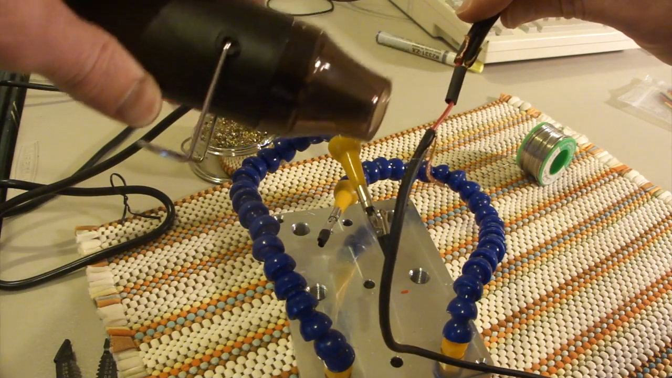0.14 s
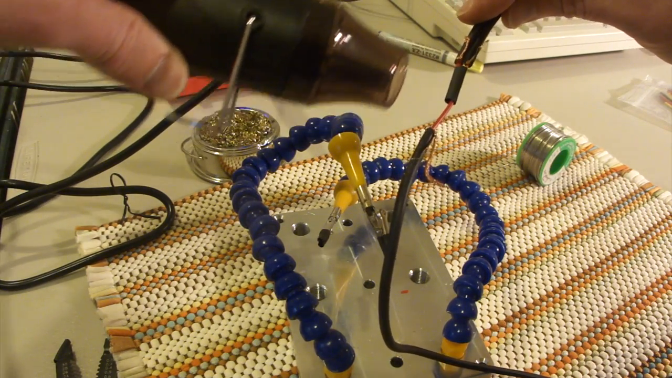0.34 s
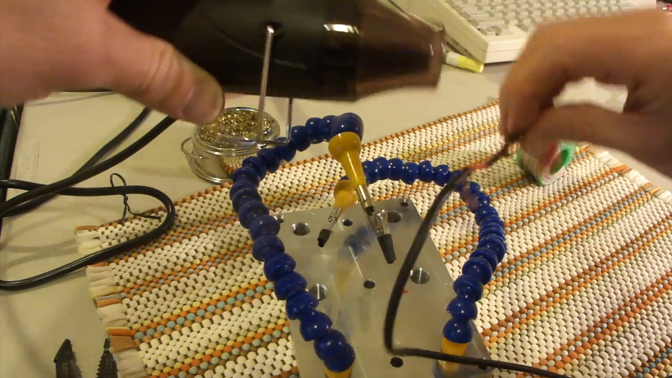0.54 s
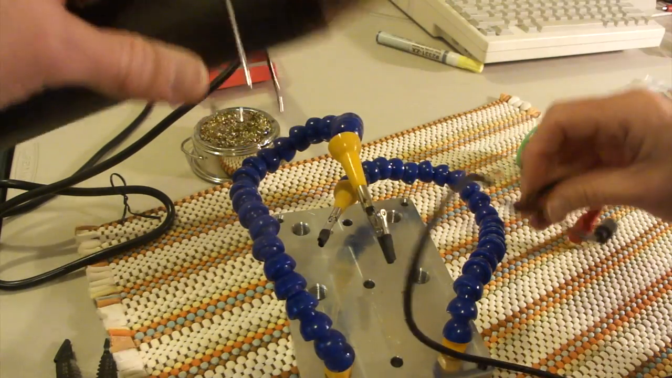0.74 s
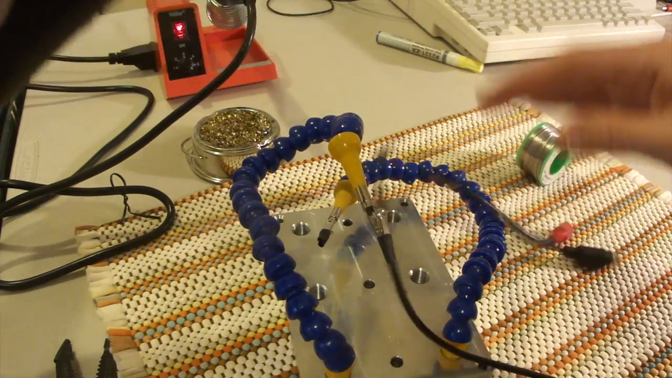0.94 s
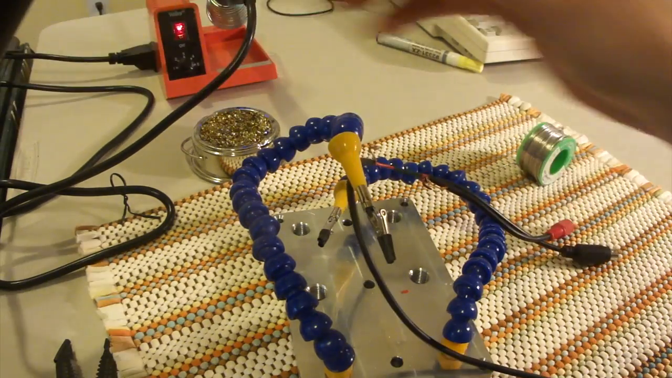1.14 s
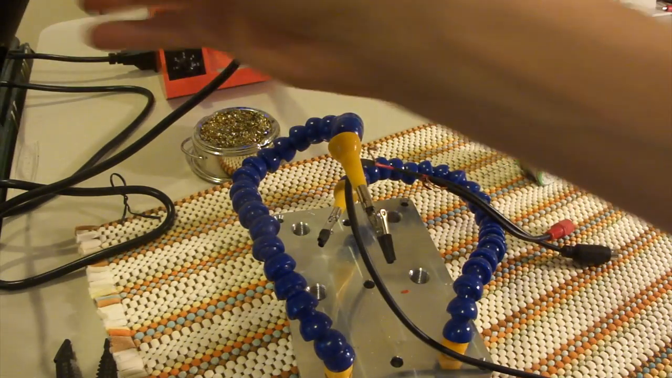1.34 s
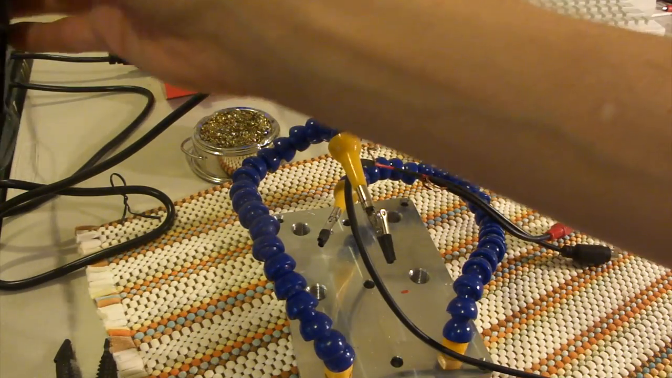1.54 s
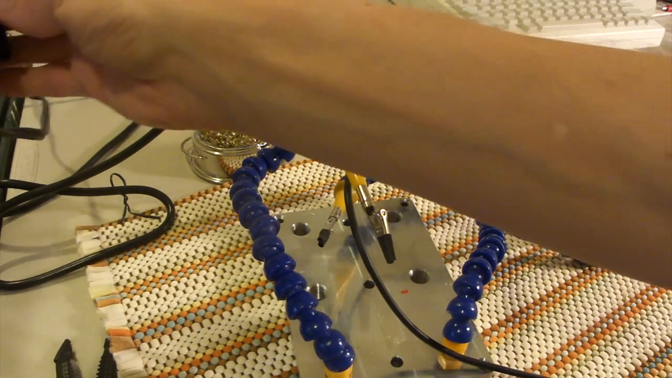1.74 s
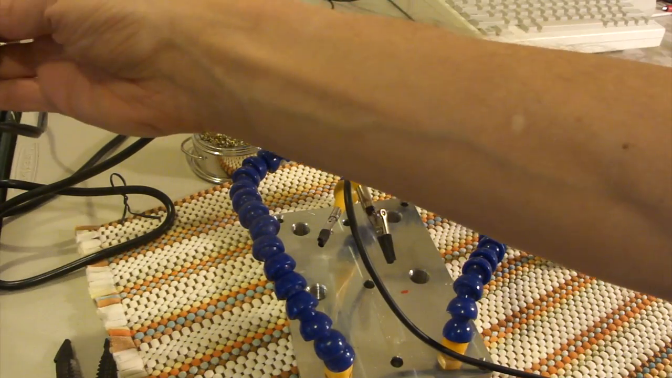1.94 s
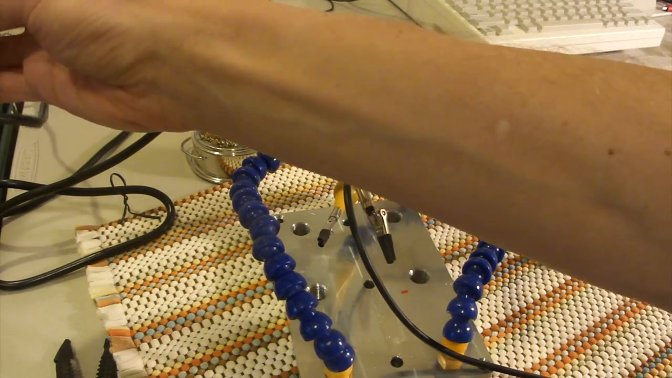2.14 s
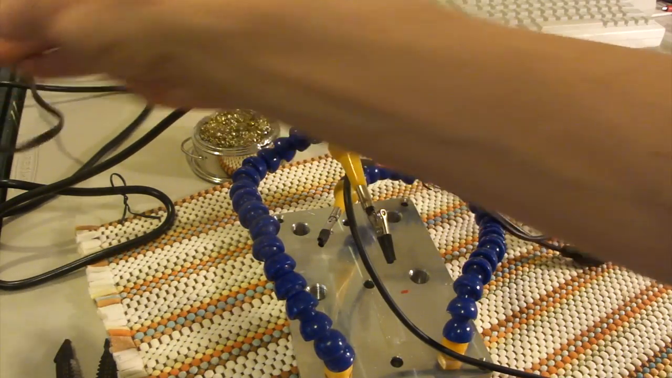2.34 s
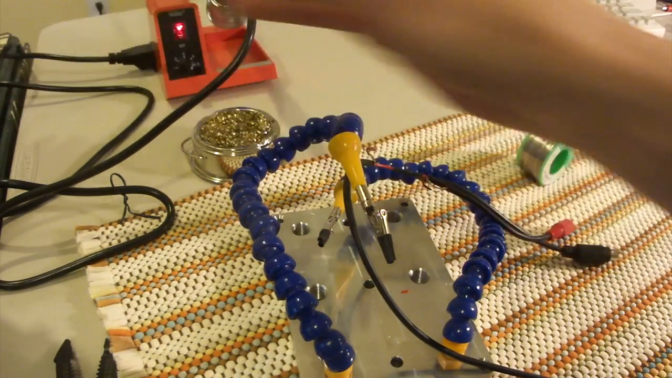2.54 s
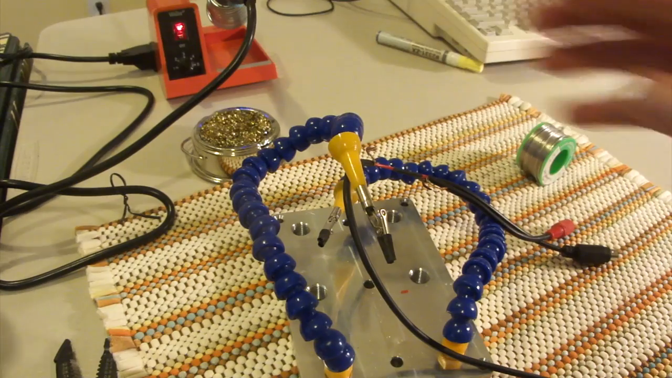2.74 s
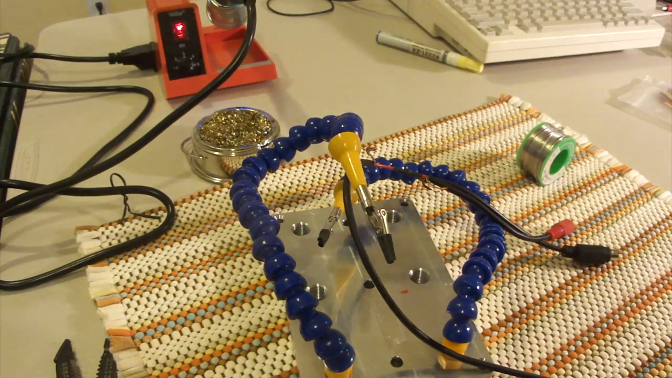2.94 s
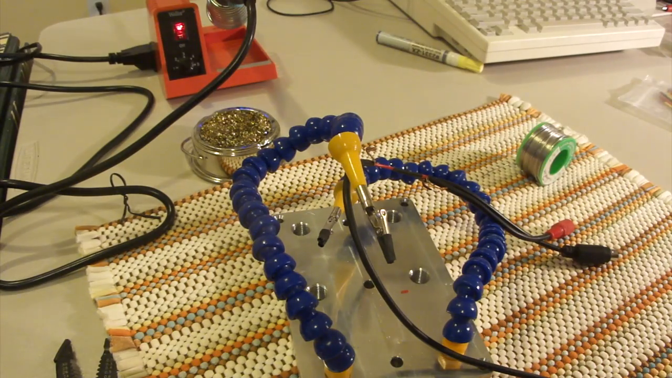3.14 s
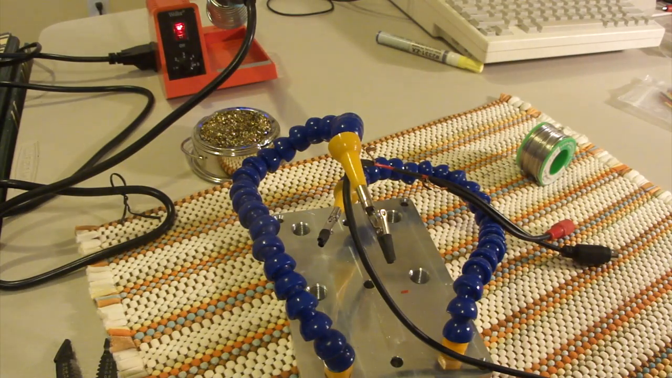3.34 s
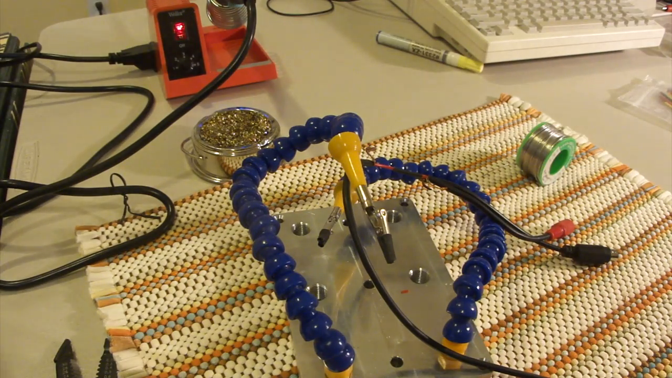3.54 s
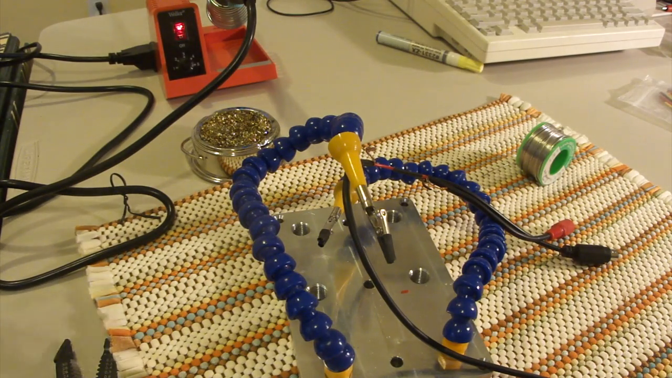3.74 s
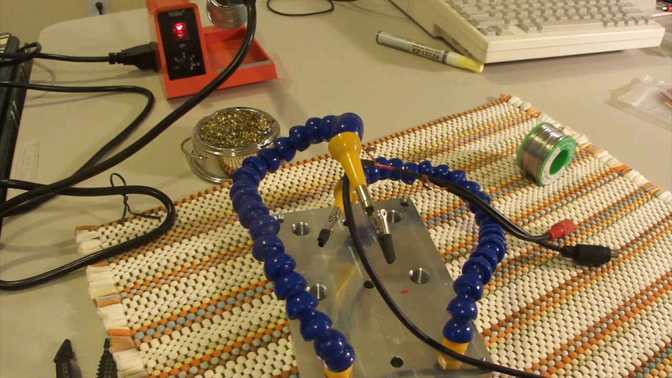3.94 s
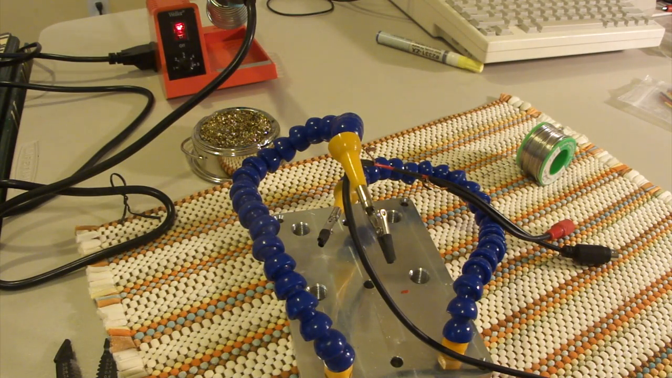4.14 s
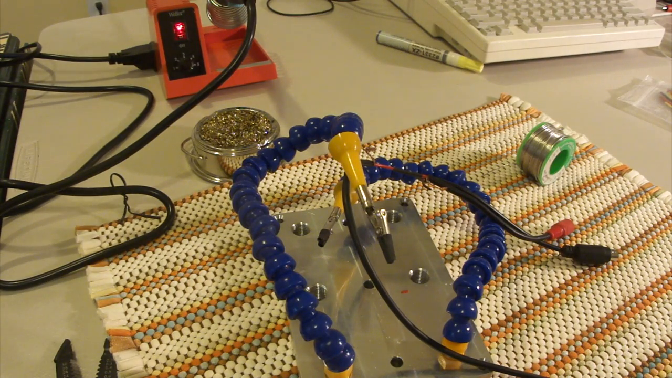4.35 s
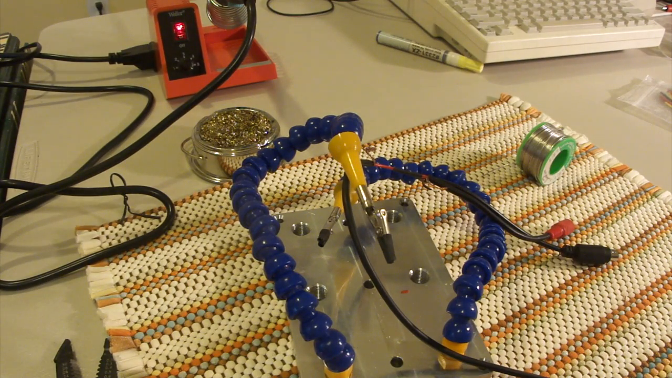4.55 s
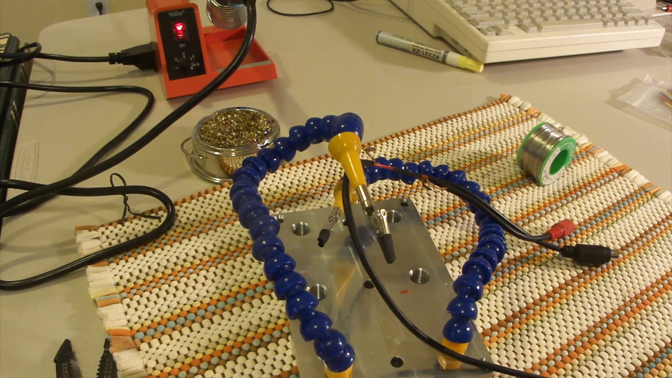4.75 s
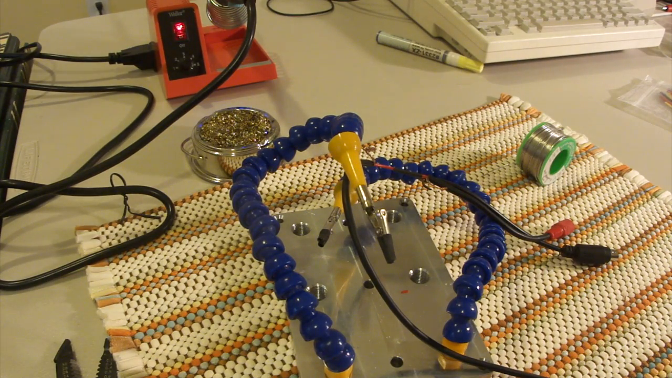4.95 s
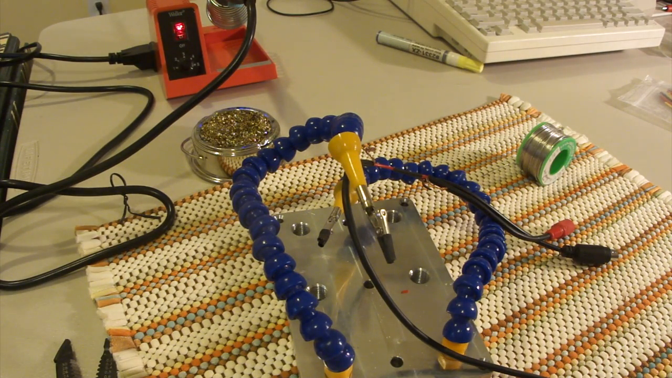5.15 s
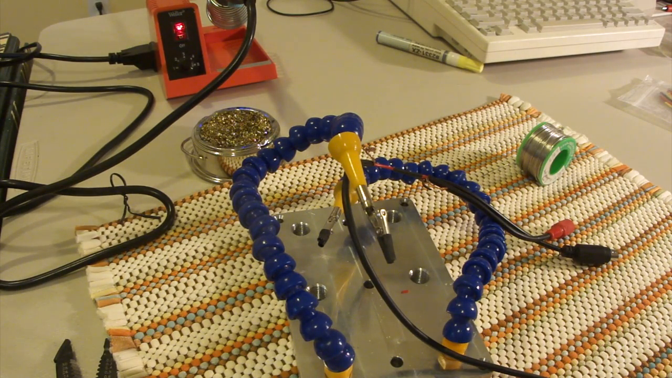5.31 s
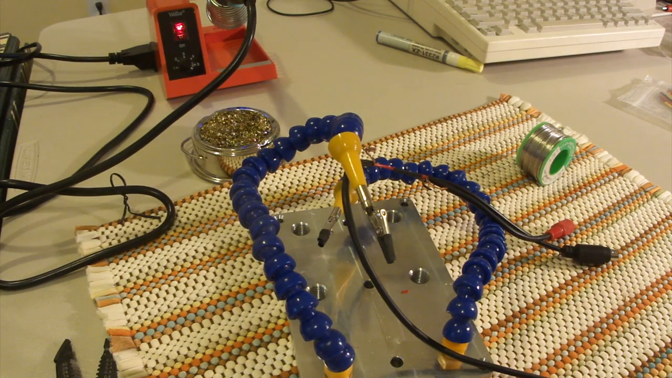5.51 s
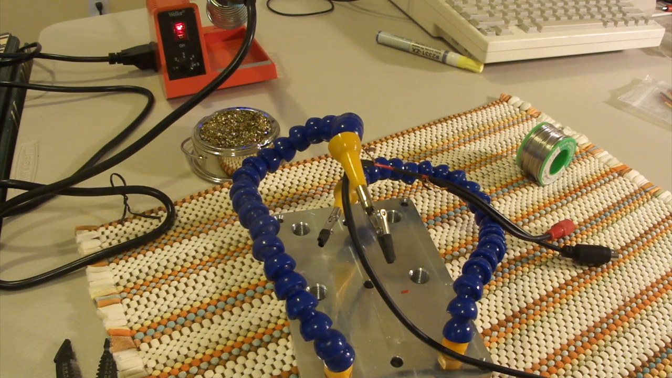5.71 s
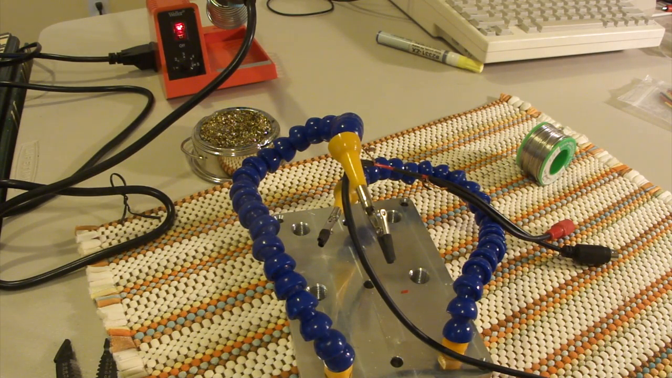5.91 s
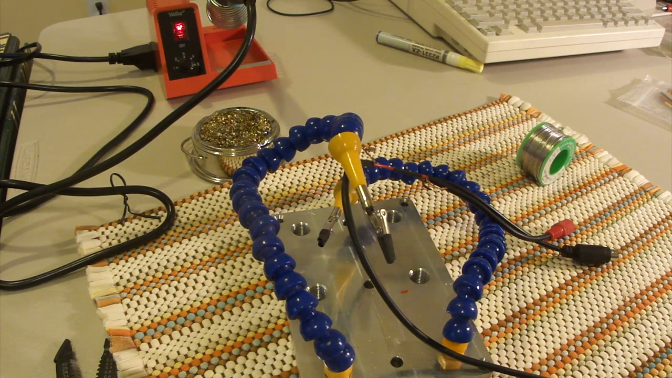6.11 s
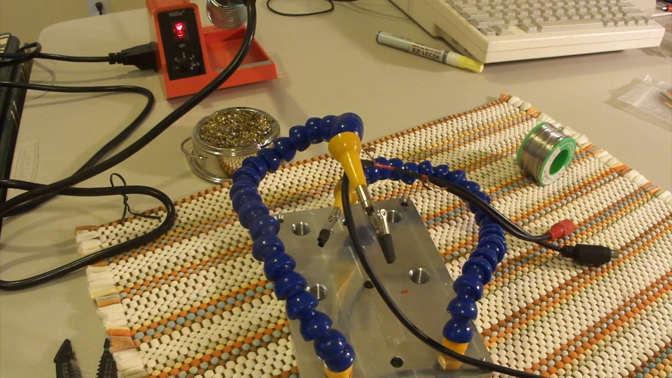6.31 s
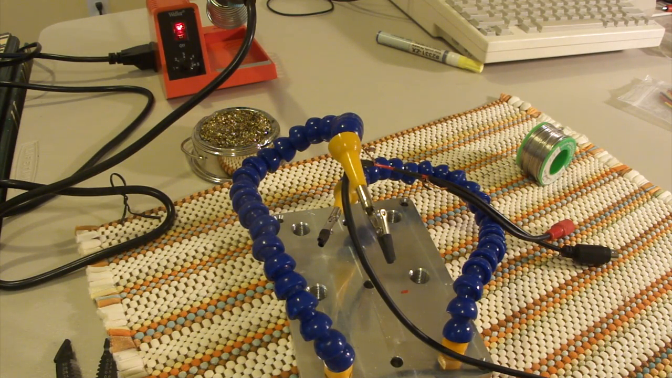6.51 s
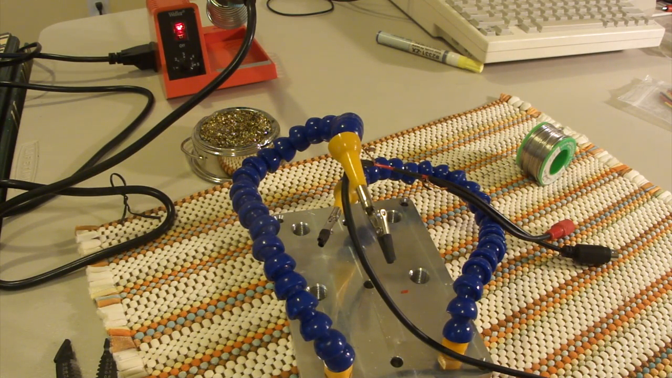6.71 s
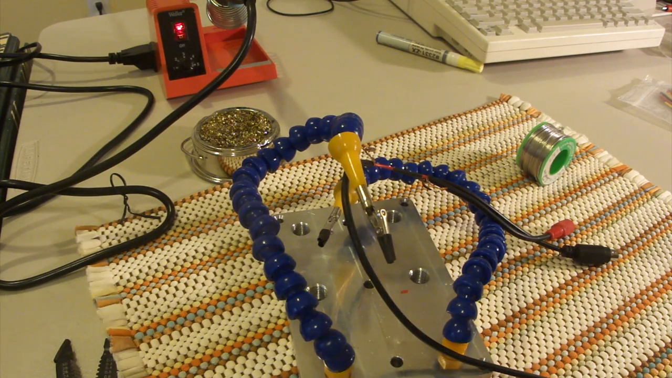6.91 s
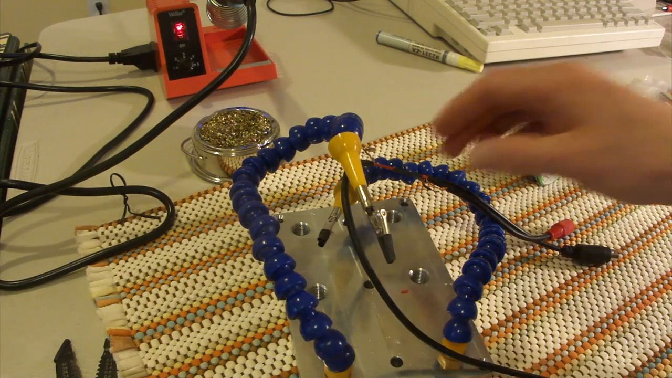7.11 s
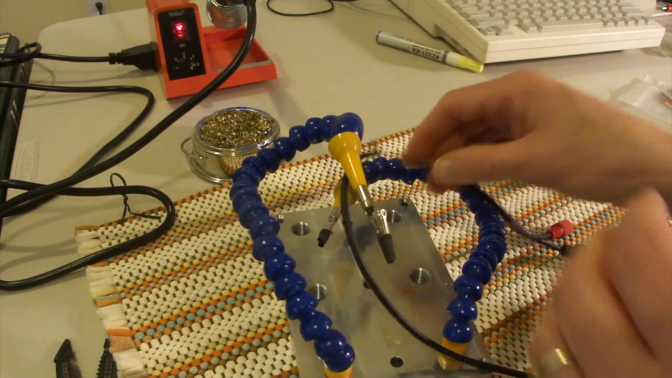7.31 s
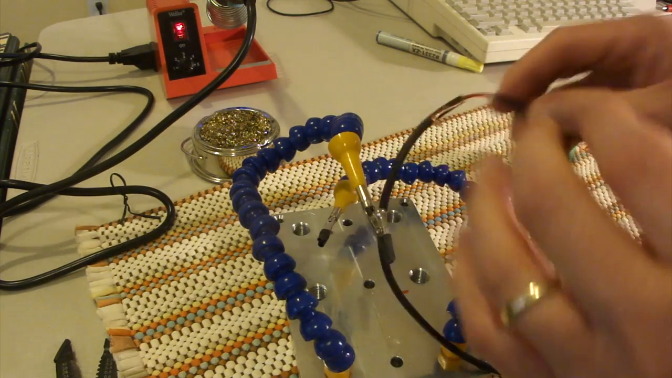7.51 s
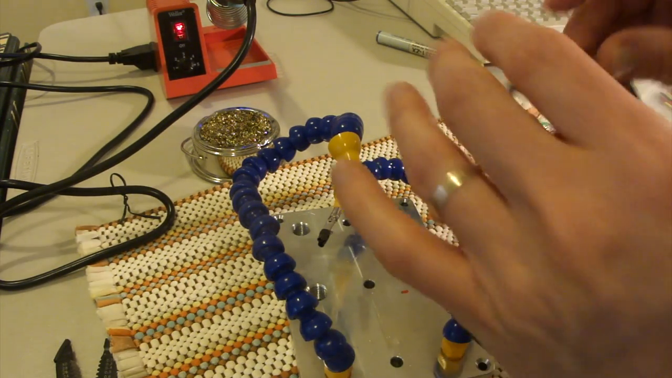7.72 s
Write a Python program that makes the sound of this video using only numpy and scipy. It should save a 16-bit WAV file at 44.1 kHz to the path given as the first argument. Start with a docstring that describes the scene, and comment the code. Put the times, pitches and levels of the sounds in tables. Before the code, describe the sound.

A rushing hot air blower and its high, steady fan whistle fill the opening, brightening slightly as the nozzle turns away. A switch click cuts power and the fan coasts down within about a second. The gun clunks down and rattles on the bench. Small hard objects click nearby and further off, with soft shuffles and close wire ticks. Close stereo microphones, small dry room, steady low noise.

```python
"""Hot air gun on a workbench

The gun blows over a soldered joint, swings aside and is switched off; it clicks as its fan coasts down.
Shaped noise makes the air; sines locked to the shaft make the whistle and the other fan tones.
The gun is put down with two knocks (damped modes and filtered impulses); small hard things are handled
nearby and further off, and a wire ticks close by. Small dry room with steady noise and mains hum;
two close microphones."""
import sys
import numpy as np
from scipy import signal
from scipy.fft import rfft, irfft, next_fast_len
from scipy.io import wavfile
from scipy.ndimage import uniform_filter1d

SR = 44100
rng = np.random.default_rng(int(sys.argv[2]) if len(sys.argv) > 2 else 0)


def store_wav(level_fs):
    """Save 16-bit WAV to argv[1]."""
    pcm = np.round(np.clip(np.atleast_2d(level_fs), -1, 1) * 32767)
    wavfile.write(sys.argv[1], SR, pcm.T.astype(np.int16))


N = 346999
TIME = np.arange(N) / SR

# Fan shaft rate; it speeds up as the nozzle leaves the joint. Each row: time in seconds, rate in Hz.
SHAFT_HZ = [(.48, 298.3), (.54, 308.8)]
# After switch-off: drag time constant, and bearing friction.
OFF_S, COAST_S, FRICTION_HZ_PER_S = 2.169, .46, 148
BLADES = 5

# Nozzle hiss as the gun turns. Each row: time in seconds, level in dB before hiss_db and fan speed.
HISS_AIM_DB = [(0.0, -40.5), (0.08, -40), (0.85, -40), (1.17, -36), (1.41, -39), (2.05, -34.5),
               (2.15, -34.5)]
# Share of the air's colour. Each row: time in seconds, share (0 = nozzle on the joint, 1 = swung aside).
ASIDE_SHARE = [(.42, 0.17), (.65, 1)]
# Air through housing and nozzle, on the joint. Each row: frequency in Hz, relative density in dB per Hz.
AIR_ON_JOINT = [(35, -80), (60, -48), (265, -26.5), (296, -10.5), (338, -24), (482, -11.5), (602, -2),
                (715, 0.5), (1090, -10), (1460, -3), (1710, -17), (1900, -4), (2080, -2.5), (2200, -12.5),
                (2550, -17.5), (2970, -46.5), (9200, -30.5), (10700, -45.5), (12000, -109.5), (15600, -125),
                (22000, -120)]
# The same, swung aside. Each row: frequency in Hz, relative density in dB per Hz.
AIR_ASIDE = [(60, -49), (120, -28), (260, -25), (430, -15.5), (560, -9.5), (620, 3), (730, 1.5),
             (1000, -6.5), (1290, -4.5), (1425, 5), (1470, 1.5), (1600, 2), (1950, -3.5), (2350, -13),
             (2700, -16), (3150, -30), (4900, -35.5), (5500, -21.5), (6200, -20), (8300, -22.5),
             (11000, -34.5), (12000, -91.5)]
RUSH_DB = -22  # at full fan speed

# Blade whistle, beamed past the microphones. Each row: time in seconds, level in dB before fan speed.
WHISTLE_DB = [(0.0, -39), (0.5, -29), (0.53, -26), (0.58, -20.5), (0.72, -21.5), (0.776, -19),
              (0.876, -16.5), (1.1, -28.5), (1.16, -23.5), (1.25, -35), (1.29, -24.5), (1.44, -25),
              (1.48, -36.5), (2.13, -39), (2.15, -29.5)]
# Other fan tones before the housing. Each row: multiple of the shaft rate, level in dB.
SHAFT_ORDERS = [(2, -43), (3, -40.5), (4, -38), (6, -39), (7, -43), (8, -36.5), (26, -50), (33, -30.5)]
# Whistle overtones before the housing. Each row: multiple of the blade rate, dB on the joint, dB aside.
BLADE_OVERTONES = [(2, -44, -38), (3, -47, -41.5), (4, -52, -41), (5, -54, -47), (6, -42, -58),
                   (7, -51, -56)]
# What the housing lets out of the overtones. Each row: frequency in Hz, gain in dB.
HOUSING_GAIN = [(500, -22), (800, -15), (1070, 3), (1300, -1), (1580, 0), (1900, -8), (2350, -7.5),
                (2700, -23), (3100, -30), (4600, -28), (6200, -15), (7700, -19), (11000, -7)]
MOTOR_DB = -49.5  # hum at the shaft rate, at full fan speed
SHRILL_HZ = 2800  # overtones above this die quickly once the fan slows

# Gun first touches the bench and chatters. Each row: start in seconds, level in dB, snap in dB re ring.
TOUCHES = [(3.072, -9, -7), (3.0812, -20, -6), (3.1034, -19.5, -37), (3.1323, -28, -30)]
# Ringing of the gun's body. Each row: frequency in Hz, level in dB, t60 in seconds.
GUN_MODES = [(203, -17.5, 0.16), (357, -17, 0.17), (464, -9, 0.047), (624, -19, 0.076), (690, -11.5, .04),
             (870, -16.5, .06), (1250, -1, 0.013), (1270, -16, 0.073), (1780, -25, 0.045)]
# Gun lands and rocks. Each row: start in seconds, level in dB before offsets, brightest contact Hz.
LANDING = [(3.2271, -19, 2200), (3.2418, 3, 9000), (3.2535, -1.5, 3000), (3.2622, -1.5, 7000),
           (3.2712, -1, 900), (3.2848, -12, 1500), (3.3058, -10, 2000), (3.335, -17, 700)]
# Ringing of the bench. Each row: frequency in Hz, relative level in dB, t60 in seconds.
BENCH_MODES = [(456, -22, .25), (502, -28, .22), (568, -27, .22), (619, -19, .2), (670, -22, .24),
               (768, -27, .16), (920, -27, .15), (1008, -22, .15), (1067, -20, .15), (1158, -18, .15),
               (1364, -27, .18), (1927, -25, .19)]
# A click of the gun as the fan coasts down, then small hard things handled nearby and further off.
# Each row: start in seconds, level in dB before lift_db, ring in Hz,
# cycles until the ring is 60 dB down, thud and snap in dB re ring, room in dB re direct.
KNOCKS = [(2.5314, -17.5, 1170, 7.2, -6, -12.5, -2.5), (2.5343, -15.5, 1700, 11, -14, -29, -7.5),
          (2.549, -31, 1250, 5.8, -3, -17, -12), (2.684, -37.5, 1100, 6.1, 10.5, -10, -1),
          (4.291, -42.5, 1180, 6.4, 11, -12, 5.5), (4.323, -26.5, 523, 15, -19, -30, -5),
          (4.409, -40.5, 1150, 32, 10, -5, 3), (4.415, -30, 530, 18, -3, -20, -10),
          (4.504, -35.5, 537, 17, 1, -24, -11), (4.564, -29.5, 1880, 9.5, -1.5, -9.5, 5),
          (5.025, -20.5, 1900, 8.5, -6, -11, -5.5), (5.034, -31, 1910, 10, -7, -9, -8),
          (5.3407, -29.5, 1510, 33, -5, -15, 0.5), (5.351, -32, 1580, 15, 2, -8.5, 0.5),
          (5.605, -34.5, 1230, 7, 1, -12, 4), (5.617, -33.5, 1960, 7.6, -4, -5.5, -3),
          (5.976, -36, 1200, 17, 4.5, -11, 2.5), (6.06, -43, 1160, 15, 3.5, -20, 4.5),
          (7.711, -34, 1720, 11, -10, -8, -10), (7.72, -34.5, 1810, 7.1, -1, -16, -5)]
# Dull part of a blow. Each row: frequency in Hz, relative density in dB per Hz.
THUD_COLOUR = [(50, -82), (130, -5), (250, -12), (500, 7.5), (900, 5), (1900, 4.5), (2500, -7.5),
               (3200, -40), (9000, -56), (13000, -74)]
# Sharp part of a blow. Each row: frequency in Hz, relative density in dB per Hz.
SNAP_COLOUR = [(100, -49), (1500, -48), (3200, -21.5), (4800, -23), (5700, -8.5), (7800, -9.5),
               (10000, -12.5), (12000, -36.5), (15000, -48)]
# Broad thump of the landing gun. Each row: frequency in Hz, relative density in dB per Hz.
BLOW_COLOUR = [(40, -105), (130, -15.5), (280, -7), (400, -2.5), (520, 4), (700, 10), (860, 2), (1200, 6),
               (1600, -6.5), (2150, -9.5), (3000, -27.5), (5000, -33), (6000, -27), (10000, -31),
               (14000, -50)]

# Wire and clamp close by. Each row: start in seconds, level in dB, ring in Hz, snap in dB re ring.
TICKS = [(6.884, -30, 1440, -3.5), (6.948, -54, 3800, 17), (6.971, -37, 1540, -5), (7.238, -45, 2000, 0),
         (7.2974, -22, 2065, -7), (7.444, -48.5, 2600, 4), (7.468, -37, 2200, -22),
         (7.5405, -34, 2110, -28), (7.694, -34.5, 1070, -26)]
# What they ring with. Each row: share of the ring pitch, level in dB, t60 in seconds.
TICK_MODES = [(0.928, 0.5, 0.015), (0.677, -7, 0.042), (1.17, -15.5, 0.025)]
# Crackle of the wire. One row: start in seconds, length in seconds, loudest dB, spread in dB.
CRACKLE = (6.885, .055, -38.5, 9)
# Faint thin ticks, probably a small focus motor. Each row: start in seconds, level in dB before step_db.
STEPS = [(3.5911, -54), (3.7248, -58), (3.7572, -54), (3.8241, -55), (3.8914, -58), (3.9578, -56.5),
         (4.0241, -54), (4.091, -53), (4.175, -51.5)]
# Soft shuffles. Each row: middle in seconds, length in seconds, level in dB before rub_db.
SHUFFLES = [(4.473, 0.24, -43.5), (4.877, 0.28, -38.5), (5.043, 0.13, -39), (5.63, 0.094, -37),
            (6.389, 0.16, -45), (7.143, 0.32, -44)]
# Colour of the rubbing. Each row: frequency in Hz, relative density in dB per Hz.
SHUFFLE_COLOUR = [(30, -50), (100, -20), (300, 9.5), (550, 10.5), (1200, 4), (2100, -1.5), (3100, -31),
                  (7000, -21.5), (11000, -30), (13000, -73.5)]

# Steady workshop noise. Each row: frequency in Hz, relative density in dB per Hz.
FLOOR_COLOUR = [(18, -49), (30, -65), (86, -21.5), (108, -21), (173, -4.5), (253, -4.5), (564, -7.5),
                (608, -7), (885, -7.5), (1140, -8.5), (2020, -12.5), (2950, -35), (4700, -42), (5600, -33),
                (9110, -30.5), (10500, -46), (12000, -75), (15600, -68.5), (22000, -120)]
FLOOR_DB = -46
# Steady workshop tones. Each row: frequency in Hz, mean rms level in dB.
HUM = [(120, -63), (240, -59.5), (720, -60), (1152, -61.5)]
# Decay of the diffuse echo. Each row: band centre in Hz, t60 in seconds.
ROOM_T60 = [(200, 0.46), (700, 0.29), (2000, 0.24), (8500, 0.24), (13000, 0.01)]
# Narrow notches of the camera. Each entry: centre in Hz.
NOTCHES_HZ = (3010, 4010, 5020)
TOP_HZ = 14700  # edge of the camera's low-pass


def coast():
    """Shaft rate in Hz: under power until OFF_S, then run down by drag and constant friction."""
    drag = np.exp(-np.maximum(TIME - OFF_S, 0) / COAST_S)
    friction_loss_hz = FRICTION_HZ_PER_S * COAST_S * (1 - drag)
    return np.maximum(curve(SHAFT_HZ) * drag - friction_loss_hz, 0)


def air(speed, hiss_db=-1.0, rush_power=2.43, hiss_power=2.53, flutter_db=1.34):
    """Turbulence rings the housing and hisses at the nozzle; both die with the fan's speed."""
    aside = curve(ASIDE_SHARE)
    on_joint_air = np.sqrt(1 - aside) * noise(AIR_ON_JOINT, wide_hz=13200, lag_us=23.6)
    aside_air = np.sqrt(aside) * noise(AIR_ASIDE, wide_hz=13200, lag_us=23.6)
    flow = on_joint_air + aside_air
    rush = signal.sosfiltfilt(signal.butter(4, 4000, fs=SR, output="sos"), flow)
    hiss = flow - rush
    # Level the hiss over 0.1 s so that HISS_AIM_DB sets it.
    hiss = hiss / np.sqrt(uniform_filter1d(np.mean(hiss ** 2, axis=0), SR // 10))
    rush = unit(rush) * undb(RUSH_DB + flutter_db * walk(24.73)) * speed ** rush_power
    hiss = hiss * undb(curve(HISS_AIM_DB) + hiss_db + 1.35 * walk(16)) * speed ** hiss_power
    return rush + hiss


def fan(shaft_hz, speed, whistle_power=0.6, tone_power=0.72, power_per_order=0.23, waver_db=3):
    """Blade whistle, motor hum, shaft tones, and overtones gliding down through the housing's resonance."""
    phase = 2 * np.pi * np.cumsum(shaft_hz * (1 + .0006 * walk(30))) / SR
    whistle = undb(curve(WHISTLE_DB) + walk(37.1)) * speed ** whistle_power * np.sin(BLADES * phase)
    whistle = whistle * np.clip(speed / 0.5, 0, 1) ** 6  # a slow rotor soon stops whistling
    motor = undb(MOTOR_DB + walk(15)) * speed ** 6 * np.sin(phase)
    tones = whistle + motor
    turning = np.clip(speed / .28, 0, 1) ** 4
    aside = curve(ASIDE_SHARE)
    for order, db in SHAFT_ORDERS:
        power = tone_power + power_per_order * order  # the highest tones fade first
        gain = undb(db + response(AIR_ASIDE, order * shaft_hz) + waver_db * walk(29.23))
        tone = np.sin(order * phase + rng.uniform(0, 2 * np.pi))
        tones = tones + turning * speed ** power * gain * tone
    for multiple, joint_db, aside_db in BLADE_OVERTONES:
        order = BLADES * multiple
        hz = order * shaft_hz
        source_db = joint_db + (aside_db - joint_db) * aside
        gain = undb(source_db + response(HOUSING_GAIN, hz) + 2 * walk(30.56))
        gain = gain * speed ** ((hz / SHRILL_HZ) ** 2)
        tones = tones + turning * gain * np.sin(order * phase + rng.uniform(0, 2 * np.pi))
    return in_room(np.sqrt(2) * tones, wet_db=-18)[:, :N]


def switch(click_db=-4, ring_hz=2020, edge_db=-4):
    """The gun's switch snaps off: a short damped ring plus a bright edge of high-passed grit."""
    out = np.zeros((2, N))
    click = knock(ring(ring_hz, .009), thud_db=-18, snap_db=9.5, room_db=-8, contact_s=.0005)
    add(out, OFF_S, undb(click_db) * click)
    bright = signal.butter(4, 7000, "highpass", fs=SR, output="sos")
    edge = signal.sosfilt(bright, grit(contact_s=.0008))
    add(out, OFF_S, undb(edge_db) * edge)
    return out


def touch(thud_db=-8):
    """The gun first touches the bench with a dry, hollow clunk of its body modes."""
    out = np.zeros((2, N))
    body = sum(undb(db) * ring(hz, t60, size=8192) for hz, db, t60 in GUN_MODES)
    for s, db, snap_db in TOUCHES:
        clunk = knock(body, thud_db, snap_db, room_db=-8, contact_s=0.0011, scrape=.2)
        add(out, s, undb(db) * clunk)
    return out


def landing(blow_db=-4, contact_s=0.0022, scrape=1.0, swell_s=0.0011):
    """Each contact gives a broad thump, duller when soft, and sets the bench top ringing."""
    out, t, blow = np.zeros((2, N)), TIME[:SR // 2], impulse(BLOW_COLOUR)
    modes = sum(undb(db) * fade(t, t60) * np.sin(2 * np.pi * hz * t) for hz, db, t60 in BENCH_MODES)
    modes = modes * (1 - np.exp(-t / swell_s))
    for s, db, top_hz in LANDING:
        soften = signal.butter(2, [150, top_hz], "bandpass", fs=SR, output="sos")
        thump = signal.sosfilt(soften, strike(blow, contact_s, scrape))
        add(out, s, in_room(thump * undb(db + blow_db), wet_db=-8))
        add(out, s, undb(db) * signal.sosfilt(soften, modes))
    return out


def ticks(pan_db=-6, wet_db=-20, step_hz=4900, step_t60=.003, step_db=5.5):
    """Light, nearly dry clicks just right of the microphones: faint steps, a brief crackle, wire and clamp."""
    snap = strike(impulse(SNAP_COLOUR), contact_s=0.0028, scrape=0.84)
    out = patter(snap + undb(-2) * ring(1860, .004), *CRACKLE, count=14)
    for s, db in STEPS:
        add(out, s, undb(db + step_db) * ring(step_hz, step_t60))
    for s, db, hz, snap_db in TICKS:
        rings = sum(undb(mode_db) * ring(share * hz, t60) for share, mode_db, t60 in TICK_MODES)
        add(out, s, undb(db) * (rings + undb(snap_db) * snap))
    pan = undb(np.array([[pan_db], [-pan_db]]) / 2)
    return in_room(out, wet_db)[:, :N] * pan


def patter(click, start_s, length_s, level_db, spread_db, count):
    """A run of tiny clicks at uneven intervals and strengths."""
    out = np.zeros(N)
    for late, strength in rng.uniform(0, 1, (count, 2)):
        add(out, start_s + length_s * late, undb(level_db - spread_db * strength) * click)
    return out


def knocks(contact_s=0.0036, lift_db=3, top_hz=9500):
    """A click of the gun, then small hard things nearby and further off: rings, thuds, snaps, low-passed."""
    out = np.zeros((2, N))
    for s, db, hz, cycles, thud_db, snap_db, room_db in KNOCKS:
        sound = knock(ring(hz, cycles / hz), thud_db, snap_db, room_db, contact_s)
        add(out, s, undb(db + lift_db) * sound)
    return signal.sosfilt(signal.butter(4, top_hz, fs=SR, output="sos"), out)


def shuffling(rub_db=-3, grain_db=1.0):
    """Uneven soft rubbing some way off: coloured noise; each move swells and fades."""
    swells = sum(undb(db) * np.exp(-(2 * (TIME - s) / length) ** 2) for s, length, db in SHUFFLES)
    return noise(SHUFFLE_COLOUR, wide_hz=8000) * swells * undb(rub_db + grain_db * walk(110))


def workshop():
    """Steady ventilation noise with mains hum that wavers slightly in level and phase."""
    hum = sum(undb(db + 1.74 * walk(5.5)) * np.sin(2 * np.pi * hz * TIME + .5 * walk(7.8)) for hz, db in HUM)
    floor = noise(FLOOR_COLOUR, wide_hz=8110, apart=0.44) * undb(FLOOR_DB + 0.13 * walk(5.3))
    return floor + np.sqrt(2) * hum


def knock(rings, thud_db, snap_db, room_db, contact_s, scrape=0.55):
    """One hard contact: the object's ring, a thud and a snap, heard in the room."""
    thud = undb(thud_db) * impulse(THUD_COLOUR, size=len(rings))
    body = strike(rings + thud, contact_s, scrape)
    snap = impulse(SNAP_COLOUR, size=len(rings))
    crack = signal.fftconvolve(snap, grit(contact_s))[:len(rings)]
    return in_room(body + undb(snap_db) * crack, room_db)


def strike(body, contact_s, scrape):
    """A body's answer to a blow followed by a brief scrape."""
    return body + scrape * signal.fftconvolve(body, grit(contact_s))[:len(body)]


def grit(contact_s, size=2048):
    """Brief roughness of two surfaces that meet: decaying noise of unit energy."""
    force = rng.standard_normal(size) * np.exp(-TIME[:size] / contact_s)
    return force / np.linalg.norm(force)


def ring(hz, t60, size=4096):
    """One damped mode of a small object, which radiates little far below or above its pitch."""
    t = TIME[:size]
    band = signal.butter(2, [hz / 2, hz * 1.5], "bandpass", fs=SR)
    return signal.lfilter(*band, np.sin(2 * np.pi * hz * t) * fade(t, t60))


def room(size=SR // 2):
    """Diffuse echo of the workshop with unit energy; each band decays at its own t60."""
    t, hz = TIME[:size], bins(size)
    spectrum = rfft(noise([(20, 0.0013), (20000, 0.0086)], wide_hz=8750, size=size))  # near white
    centres = [f for f, _ in ROOM_T60]
    shares = [response(list(zip(centres, pick)), hz) for pick in np.eye(len(centres))]
    tail = sum(irfft(spectrum * share, size) * fade(t, t60) for share, (_, t60) in zip(shares, ROOM_T60))
    tail = tail * np.clip(t / 0.003 - .4, 0, 1)  # the nearest walls answer after a few ms
    return tail / np.sqrt(np.sum(tail ** 2) / 2)


def in_room(x, wet_db):
    """Direct sound plus its echo, in stereo."""
    echo = room() * undb(wet_db)
    echo[:, 0] += 1
    return signal.fftconvolve(x[None], echo, axes=1)


def noise(points, wide_hz, lag_us=0, apart=0.031, size=N):
    """Coloured noise at two close microphones: nearly alike in the bass, unrelated towards wide_hz."""
    padded = next_fast_len(size, True)
    hz = bins(padded)
    mid, side = rfft(rng.standard_normal((2, padded)))
    side = side * np.minimum(np.hypot(apart, hz / wide_hz), 1)
    late = np.exp(-2j * np.pi * hz * lag_us / 10 ** 6)  # delays the left
    stereo = np.array([(mid + side) * late, mid - side])
    return unit(irfft(stereo * undb(response(points, hz)), padded)[:, :size])


def impulse(points, size=4096):
    """Causal minimum-phase pulse with the given colour, peak 1."""
    cepstrum = irfft(np.log(undb(response(points, bins(size)))))
    cepstrum[1:size // 2] *= 2
    cepstrum[size // 2 + 1:] = 0
    pulse = irfft(np.exp(rfft(cepstrum)))
    return pulse / np.abs(pulse).max()


def walk(rate_hz):
    """Random levels held 1 / rate_hz seconds and smoothed twice; rms 1."""
    k = int(SR / rate_hz)
    held = np.repeat(rng.standard_normal(N // k + 1), k)
    return unit(uniform_filter1d(uniform_filter1d(held, k), k)[:N])


def fade(t, t60):
    """Exponential decay, 60 dB down after t60."""
    return np.exp(-np.log(1000) * t / t60)


def curve(rows):
    """A (seconds, value) table joined by straight lines in time."""
    s, value = np.transpose(rows)
    return np.interp(TIME, s, value)


def response(points, hz):
    """Value of a (Hz, value) table on a log-frequency axis."""
    f, value = np.transpose(points)
    return np.interp(np.log(np.maximum(hz, 1)), np.log(f), value)


def bins(size):
    """Frequencies in Hz of a spectrum of size samples."""
    return np.fft.rfftfreq(size, 1 / SR)


def undb(db):
    """Decibels to gain."""
    return 10 ** (np.asarray(db) / 20)


def unit(x):
    """Scale to rms 1."""
    return x / np.sqrt(np.mean(x ** 2))


def add(out, s, sound):
    """Mix a sound in at time s."""
    start = int(s * SR)
    part = sound[..., :N - start]
    out[..., start:start + part.shape[-1]] += part


def scene():
    """The fan's speed drives air and tones; the switch, handling sounds and room noise are added."""
    shaft_hz = coast()
    speed = shaft_hz / shaft_hz.max()
    gun = air(speed) + fan(shaft_hz, speed) + switch() + touch() + landing()
    return gun + ticks() + knocks() + shuffling() + workshop()


def record(dry):
    """The camera has three narrow notches, clips at full scale and cuts the top."""
    for hz in NOTCHES_HZ:
        notch = signal.butter(2, [hz - 125, hz + 125], "bandstop", fs=SR, output="sos")
        dry = signal.sosfilt(notch, dry)
    top_cut = signal.ellip(8, .2, 70, TOP_HZ, fs=SR, output="sos")
    return signal.sosfilt(top_cut, np.clip(dry, -1, 1))


dry = scene()
out = record(dry)
store_wav(out)
```